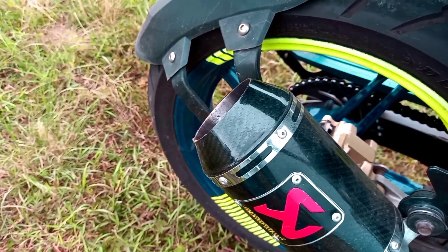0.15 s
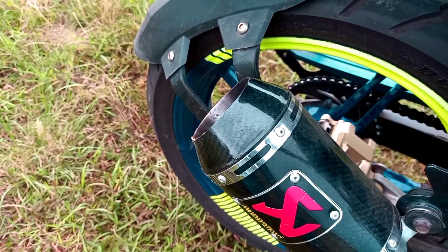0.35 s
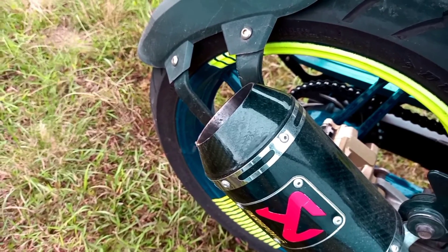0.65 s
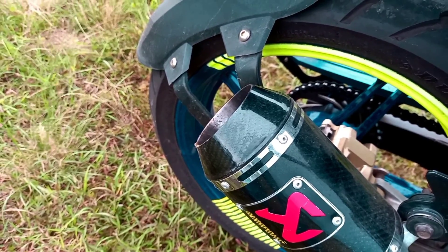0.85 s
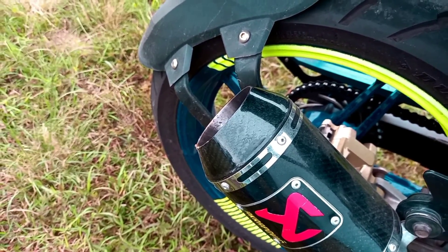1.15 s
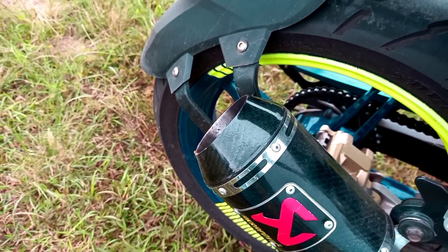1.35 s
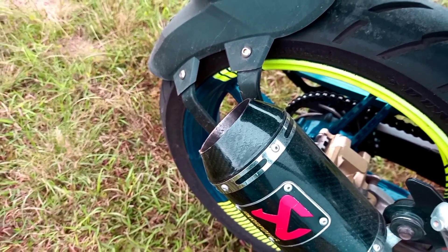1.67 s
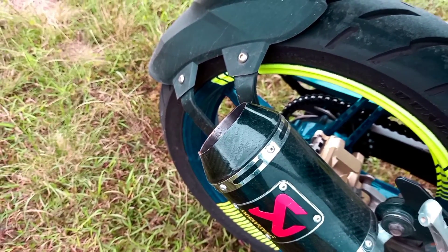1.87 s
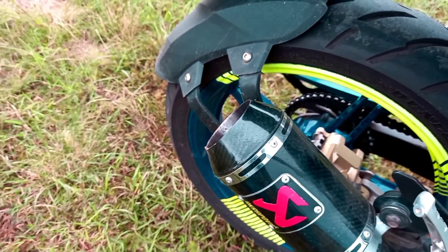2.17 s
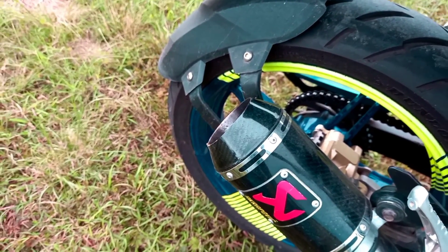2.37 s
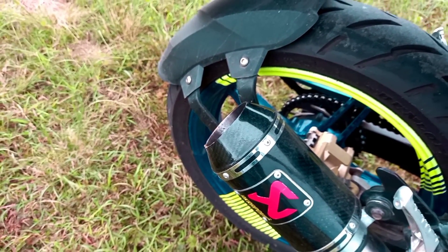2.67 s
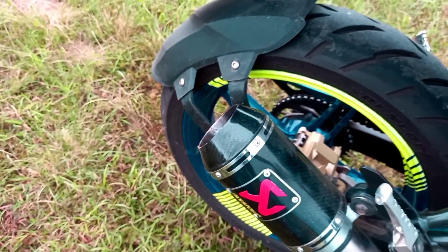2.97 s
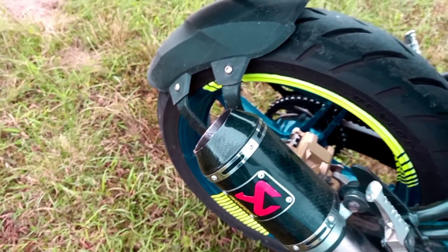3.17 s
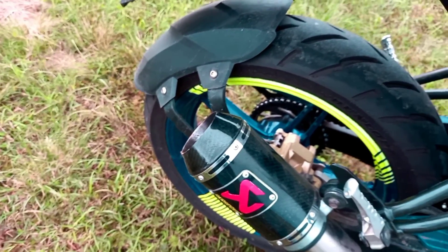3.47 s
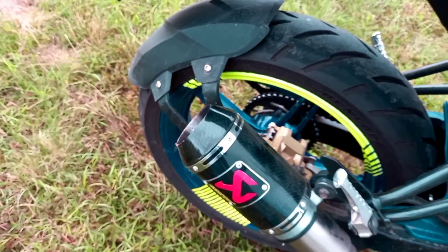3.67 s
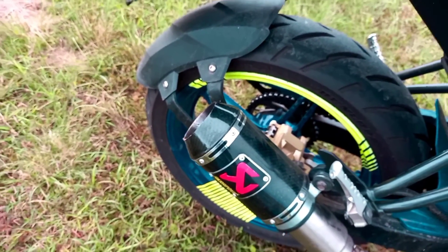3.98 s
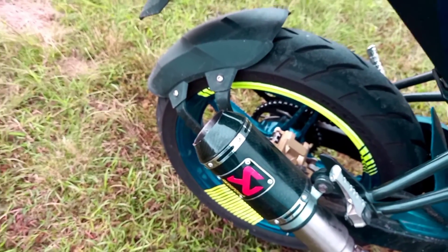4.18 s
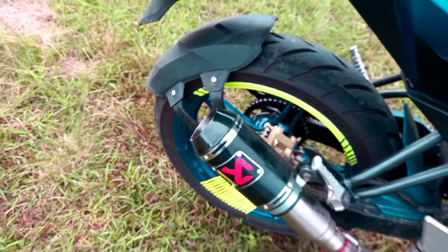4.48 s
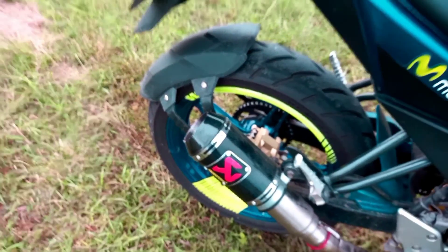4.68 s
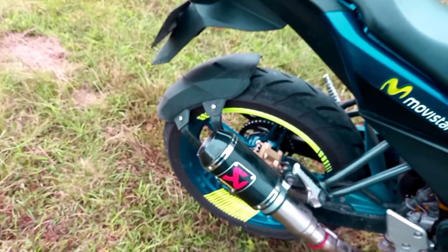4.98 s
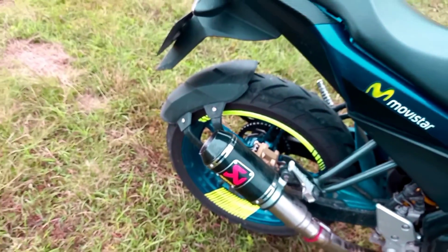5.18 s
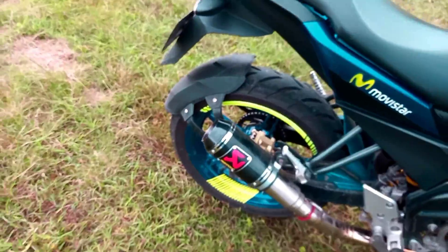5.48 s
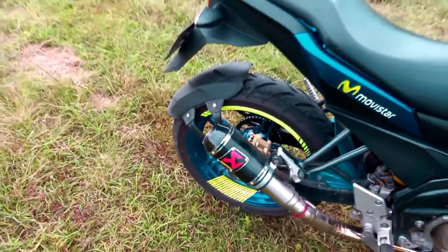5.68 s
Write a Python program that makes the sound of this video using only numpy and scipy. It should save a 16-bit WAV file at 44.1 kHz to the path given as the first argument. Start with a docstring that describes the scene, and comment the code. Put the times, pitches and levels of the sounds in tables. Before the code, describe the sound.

Close to the exhaust in an open field, a motorcycle engine falls from high revs, growling and spitting as it slows. It sputters weakly, almost dying, and a faint rooster crows in the distance. The engine recovers into a loping, uneven idle with booming pops, ticking valves and metallic chatter. A breeze rises and briefly thumps the microphone on the right.

```python
"""Motorcycle running down to idle.

A single-cylinder four-stroke with an open muffler, a metre away in a field, coasts from a hard rev,
nearly stalls, then lopes on strong and weak strokes. Each exhaust valve opening rings the pipe and
spits gas; the engine clatters behind it. Gusts buffet the microphone, a rooster crows far off,
and the phone rounds the loudest booms."""
import sys
import numpy as np
from scipy import signal
from scipy.fft import rfft, irfft, next_fast_len
from scipy.io import wavfile

SR = 44100
rng = np.random.default_rng(int(sys.argv[2]) if len(sys.argv) > 2 else 0)


def persist_wave(psi):
    """Save psi, clipped to +-1, as 16-bit WAV."""
    counts = np.round(np.clip(psi, -1, 1) * 32767).astype(np.int16)
    wavfile.write(sys.argv[1], SR, np.atleast_2d(counts).T)


N = 257544
TIME = np.arange(N) / SR
FFT_SIZE = next_fast_len(N + SR)
FREQ_HZ = np.arange(FFT_SIZE // 2 + 1) * SR / FFT_SIZE
OVERLAP_CYCLES, MAX_CYCLE_S = .273, .125  # valve opening to valve overlap; cap on cycle length

# pipe and muffler modes: f/Hz, width/Hz, signed gain, left minus right/dB
PIPE_MODES = [(83.34, 6.4, -5.5, 0), (169.9, 10.7, 0.9265, -1.5), (259.8, 19, 0.41, -0.5),
              (289.5, 21.4, 0.6357, -0.5), (348.8, 14, 0.36, 0), (410, 55, 0.0145, -1.5),
              (465.3, 14, 0.18, -3.5), (570, 200, -0.04, -0.5), (712, 57, 0.21, -3)]
# gas while coasting: t/s, hiss level/dB, rasp level/dB
GAS_LEVELS = [(0, -50.5, -29.5), (.3, -47.5, -28.5), (.42, -49, -33.5), (1.3, -58.5, -41)]
# gas rasp spectrum: f/Hz, relative level/dB
RASP_SPECTRUM = [(120, -8.5), (300, 4), (500, 4.5), (750, 0.5), (1100, -14.5), (2000, -19), (4000, -31.5),
                 (9000, -34.5)]
# bark and crack spectrum: f/Hz, relative level/dB
BARK_SPECTRUM = [(250, -10.5), (500, -2.5), (780, 3.5), (1050, -7), (1600, -6.5), (2500, -18.5),
                 (6000, -34)]
# running gear, fading as it slows, back at idle: t/s, level/dB
GEAR_LEVELS = [(0, -37), (.65, -46), (2.2, -50.5), (3, -44.5), (5.84, -44.5)]


def undb(db):
    """Decibels to gain."""
    return 10 ** (np.asarray(db) / 20)


def curves(table, at_s=TIME):
    """Table columns, interpolated linearly in time."""
    times, *columns = np.transpose(table)
    return [np.interp(at_s, times, column) for column in columns]


def pan(db):
    """Stereo gains for a left minus right level, constant or per sample."""
    return undb(np.array([[1], [-1]]) * db / 2)


def filtered(x, response):
    """Apply a frequency response."""
    return irfft(rfft(x, FFT_SIZE) * response, FFT_SIZE)[..., :N]


def resonance(hz, width_hz):
    """Band-pass response of one mode, peak 1."""
    s = 1j * FREQ_HZ
    return s * width_hz / (hz ** 2 + s * s + s * width_hz)


def impulses(times, sizes):
    """One impulse per event."""
    return np.bincount(np.clip(times * SR, 0, N).astype(int), sizes, N + 1)[:N]


def puffs(times, sizes, rise_s, decay_s):
    """Envelope of bursts, each peaking at its size."""
    t = TIME[:SR // 4]
    shape = (1 - np.exp(-(t / rise_s) ** 2)) * np.exp(-t / decay_s)
    return signal.fftconvolve(impulses(times, sizes), shape / shape.max())[:N]


def flutter(rate_hz, points):
    """Gaussian random points joined by lines."""
    return np.interp(TIME, np.arange(points) / rate_hz, rng.standard_normal(points))


def noise(spectrum, treble_correlation):
    """Stereo noise, rms 1; the sides are alike in the bass and part in the treble."""
    hz, db = np.transpose(spectrum)
    gain = undb(np.interp(np.log(FREQ_HZ + 1), np.log(hz), db))
    correlation = np.clip(treble_correlation + (1 - treble_correlation) / (1 + (FREQ_HZ / 300) ** 2), -1, 1)
    mid = filtered(rng.standard_normal(N), gain * np.sqrt(1 + correlation))
    side = filtered(rng.standard_normal(N), gain * np.sqrt(1 - correlation))
    out = np.array([mid + side, mid - side])
    return out / out.std()


def coasting(start_hz=35.53, drag_s=1.6915, friction_hz_per_s=2.276, end_s=1.35):
    """Throttle shut: drag and friction slow the cycles; suction fades, and dips in step with the pipe."""
    t = TIME[TIME < end_s]
    friction_hz = friction_hz_per_s * drag_s
    cycle_hz = (start_hz + friction_hz) * np.exp(-t / drag_s) - friction_hz
    cycles = np.cumsum(cycle_hz) / SR
    times = .0024 + np.interp(np.arange(np.ceil(cycles[-1])), cycles, t)
    stroke_hz = np.interp(times, t, cycle_hz)
    in_step = np.abs(np.cos(np.pi * PIPE_MODES[0][0] / stroke_hz)) ** 8.4
    pace = stroke_hz / start_hz
    opening = -.81 * pace ** .57 * (1 - .41 * in_step)
    overlap = -.52 * pace ** .91 * (1 - .29 * in_step)
    return times, opening, overlap


def exhaust(times, cycle_s, opening, overlap, sharp_hz=305, soft_hz=220, mouth_hz=90):
    """Two pressure steps a cycle ring the pipe: one at valve opening, a softer one at valve overlap."""
    # muffler bearing: t/s, left minus right/dB
    bearing = [(0, .6), (1.2, .7), (2.7, -.1), (4.2, .4), (5, -2), (5.84, .4)]
    s = 1j * FREQ_HZ
    steepness = np.minimum(np.abs(opening) / .95, 1)  # stronger step, steeper front
    sharp = impulses(times, opening * steepness)
    soft = impulses(times, opening * (1 - steepness))
    soft += impulses(times + OVERLAP_CYCLES * cycle_s - .0017, overlap)
    drive = rfft(sharp, FFT_SIZE) / (1 + s / sharp_hz) ** 3
    drive += rfft(soft, FFT_SIZE) / (1 + s / soft_hz) ** 3
    pipe = sum(pan(db) * gain * resonance(hz, width_hz) for hz, width_hz, gain, db in PIPE_MODES)
    radiation = s * s / (s * s + np.sqrt(2) * s * mouth_hz + mouth_hz ** 2)  # small mouth, little deep bass
    direct = irfft(drive * pipe * radiation, FFT_SIZE)[:, :N] * SR * undb(-40)
    # wheel, frame and ground scatter the shorter waves, setting the sides apart
    tail = rng.standard_normal(SR // 8) * np.exp(-TIME[:SR // 8] / .0071)
    scatter = rfft(tail / np.linalg.norm(tail), FFT_SIZE) * s / (s + 200)
    side = undb(-12) * filtered(direct.mean(axis=0), scatter)
    return (direct + np.array([side, -side])) * pan(curves(bearing)[0])


def burble(times, pressure, start_hz=300, end_hz=480, hot_hz=462, glide_s=.019, cooling_s=.051):
    """An upper pipe mode bends up as hot gas fills the muffler; at speed it holds steady."""
    t = TIME[:SR // 8]
    glide_hz = end_hz + (start_hz - end_hz) * np.exp(-t / glide_s)
    envelope = (1 - np.exp(-(t / .011) ** 2)) * np.exp(-t / .015)
    cooling = 1 - np.exp(-(np.diff(times, prepend=0) / cooling_s) ** 3)
    out = np.zeros(N + len(t))
    for onset_s, size, cooled in zip(times, np.abs(pressure), cooling):
        pitch_jitter, level_jitter = rng.standard_normal(2)
        hz = cooled * glide_hz * (1 + .035 * pitch_jitter) + (1 - cooled) * hot_hz
        ring = np.sin(2 * np.pi * np.cumsum(hz) / SR)
        start = int(onset_s * SR)
        out[start:start + len(t)] += size ** .7 * undb(-16 + 1.4 * level_jitter) * envelope * ring
    return out[:N] * pan(-1.5)


def coasting_gas(times, afterfire_s=.907, rasp_rise_s=.008, rasp_decay_s=.0083):
    """The jet spits hiss at each stroke; its rasp, much alike in every cycle, growls."""
    # hiss spectrum: f/Hz, relative level/dB
    hiss_spectrum = [(1000, -15.5), (2500, -4), (4000, 1.5), (7000, -1), (9000, -3), (12500, 1.5),
                     (15500, -6)]
    hiss_db, rasp_db = curves(GAS_LEVELS, times)
    spit_db = hiss_db + 3.9 * rng.standard_normal(len(times))
    spit = puffs(times + .0025, undb(spit_db), rise_s=.0092, decay_s=.0098)
    starts = np.append(times + .0011, afterfire_s)  # unburnt fuel flares once in the pipe
    sizes = undb(np.append(rasp_db + 2, -27.5))
    jet = noise(RASP_SPECTRUM, .3)
    fresh = puffs(starts, sizes, rasp_rise_s, rasp_decay_s) * jet
    one_rasp = puffs(np.zeros(1), np.ones(1), rasp_rise_s, rasp_decay_s) * jet[:, ::-1]
    repeated = filtered(impulses(starts, sizes), rfft(one_rasp, FFT_SIZE))
    return spit * noise(hiss_spectrum, .1) * pan(.92) + np.sqrt(.5) * (repeated + fresh) * pan(-2.1)


def cracks(coast_times, pop_times, pressure):
    """Hard cracks: one per coasting stroke, one at valve overlap after a missed idle stroke."""
    _, rasp_db = curves(GAS_LEVELS, coast_times)
    times = np.append(coast_times + .004, pop_times + OVERLAP_CYCLES * MAX_CYCLE_S)
    sizes = np.append(undb(rasp_db - 5), undb(-35) * np.minimum(pressure, 0) ** 2)
    return puffs(times, sizes, rise_s=.0016, decay_s=.0039) * noise(BARK_SPECTRUM, .15) * pan(-1.5)


def idle_gas(times, force):
    """Each pop vents hiss and rasp that grow steeply with force; the hardest bark."""
    # hiss spectrum: f/Hz, relative level/dB
    hiss_spectrum = [(800, 0), (1800, 3.5), (3500, 0), (6000, 3.5), (8000, -4.5), (13000, -5.5),
                     (15500, -14)]
    spit = puffs(times, force ** 1.2 * undb(-45), rise_s=.0027, decay_s=.0039)
    rasp = puffs(times, force ** 2.2 * undb(-33.5), rise_s=.0039, decay_s=.035)
    bark = puffs(times + .0031, force ** 3.3 * undb(-26), rise_s=.0011, decay_s=.009)
    hiss = spit * noise(hiss_spectrum, .1)
    return hiss + (rasp * noise(RASP_SPECTRUM, .37) + bark * noise(BARK_SPECTRUM, .14)) * pan(-3)


def machinery(times, cycle_s, pop_times, force):
    """Chain and gears rustle, valves tick, gears chatter under compression just before each pop."""
    # chain and gear spectrum: f/Hz, relative level/dB
    rustle_spectrum = [(30, 6.5), (100, 11), (300, 17.5), (600, 8.5), (800, 5), (1100, 2), (1600, -2),
                       (2300, -1), (2900, -7), (3400, -9), (4500, -12.5), (6500, -17), (8000, -22),
                       (15000, -23.5)]
    # metal impact spectrum: f/Hz, relative level/dB
    impact_spectrum = [(300, -8), (800, -2.5), (1250, 6), (1800, -2.5), (2150, 3), (2400, 3), (2750, -1.5),
                       (3200, -4.5), (3450, -2), (3800, -5.5), (4400, -5), (5200, -9), (6200, -11),
                       (7600, -24.5), (15000, -30)]
    gear_gain = undb(curves(GEAR_LEVELS)[0])
    # nine small impacts per knock
    time_jitter, level_jitter = rng.standard_normal((len(pop_times), 2, 9)).transpose(1, 0, 2)
    impact_times = pop_times[:, None] - .018 + .007 * time_jitter
    knock_db = curves(GEAR_LEVELS, pop_times)[0] - 5.5 + 11.5 * np.log10(force)
    impact_db = knock_db[:, None] + 2 * level_jitter
    knocks = puffs(impact_times.ravel(), undb(impact_db).ravel(), rise_s=.001, decay_s=.0062)
    tick_times = (times[:, None] + cycle_s[:, None] * np.array([.33, .58])).ravel()
    tick_sizes = undb(-5 + 7 * rng.standard_normal(len(tick_times)))
    ticks = gear_gain * puffs(tick_times, tick_sizes, rise_s=.0003, decay_s=.00074)
    rustle = gear_gain * undb(2.5 + 1.4 * flutter(90, 600)) * noise(rustle_spectrum, .019)
    return (rustle + (knocks + ticks) * noise(impact_spectrum, .067)) * pan(.77)


def casing(pop_times, approach_start_s=2.9, approach_s=1.6):
    """The gears ring the metal casing, most under compression; it emerges as the phone nears."""
    # casing modes: f/Hz, width/Hz, relative level/dB
    modes = [(2420, 140, -5.5), (3454, 64, 5), (3955, 90, 0.5), (5930, 89, -9.5)]
    response = sum(undb(db) * resonance(hz, width_hz) for hz, width_hz, db in modes)
    ring = filtered(rng.standard_normal((2, N)), response)
    nearness = np.clip((TIME - approach_start_s) / approach_s, 0, 1)
    throb = .55 + puffs(pop_times - .025, np.ones(len(pop_times)), rise_s=.006, decay_s=.037)
    return nearness * throb * undb(curves(GEAR_LEVELS)[0] - 14) * ring / ring.std()


def wind(breeze_start_s=2.53, breeze_rise_s=1.5):
    """A breeze gets up; gusts slap the microphone unevenly, mostly on the right."""
    # gusts: t/s, peak level/dB, rise/s, fall/s
    gusts = [(4.139, -39.5, 0.066, 0.036), (5.0, -21.5, .1, 0.092), (5.028, -20, 0.0077, 0.023),
             (5.37, -38.5, 0.033, 0.045)]
    # buffeting spectrum: f/Hz, relative level/dB
    buffet_spectrum = [(25, -11.5), (80, 9), (260, 4.5), (400, -2), (600, -9), (1200, -21.5), (2500, -44.5),
                       (6000, -61), (12000, -69.5)]
    envelope = undb(-40) * np.clip((TIME - breeze_start_s) / breeze_rise_s, 0, 1)
    for peak_s, db, rise_s, fall_s in gusts:
        width_s = np.where(TIME < peak_s, rise_s, fall_s)
        envelope += undb(db) * np.exp(-((TIME - peak_s) / width_s) ** 2)
    slaps = undb(1.3 * flutter(190, 1200))
    return envelope * slaps * noise(buffet_spectrum, .19) * pan(-20.5)


def rooster(start_s=1.06, end_s=2.13, fade_s=.035, throat_width_hz=330):
    """One far, hoarse note scoops up, sags and drops; two throat resonances favour nearby partials."""
    # crow partials: harmonic number, relative level/dB
    partials = [(2, -9), (3, 0.5), (4, -3), (6, -17), (7, -5)]
    # lower throat resonance: t/s, f/Hz
    throat = [(1.16, 2500), (1.27, 2920), (1.4, 2950), (1.52, 2240), (2.02, 2300), (2.1, 1900)]
    since_s, left_s = np.maximum(TIME - start_s, 0), np.maximum(end_s - TIME, 0)
    scoop_hz, drop_hz = 80 * np.exp(-since_s / .12), 237 * np.exp(-left_s / .067)
    hz = 668 - 28 * since_s - scoop_hz - drop_hz
    envelope = np.minimum(np.minimum(since_s, left_s) / fade_s, 1)
    throat_hz, = curves(throat)
    phase = 2 * np.pi * np.cumsum(hz * (1 + .0076 * flutter(190, 1200))) / SR
    out = 0
    for harmonic, db in partials:
        lower_loss_db = 3 * ((harmonic * hz - throat_hz) / throat_width_hz) ** 2
        upper_loss_db = 3 * ((harmonic * hz - 1.57 * throat_hz) / throat_width_hz) ** 2 + 5
        loss_db = np.minimum(np.minimum(lower_loss_db, upper_loss_db), 15)
        out += undb(db - 57 - loss_db) * np.sin(harmonic * phase)
    return envelope * out


def scene():
    """The run-down passes straight into the single pops of the idle."""
    # idle pops: t/s, relative pressure at valve opening (+ fired, blows; - missed, sucks)
    pops = [(1.3964, 0.32), (1.4705, -0.5), (1.5517, -0.31), (1.6374, -0.32), (1.7574, -0.18),
            (1.8307, -0.22), (1.934, 0.29), (2.08, -0.14), (2.1675, 0.4), (2.3214, -0.13), (2.4156, 0.53),
            (2.5413, 0.29), (2.6677, 0.61), (2.7814, -0.31), (2.9009, 0.73), (3.0168, 0.36), (3.1363, 0.91),
            (3.2478, -0.78), (3.3701, 0.91), (3.4834, -0.6), (3.6043, 0.77), (3.719, -0.34), (3.8422, 0.83),
            (3.9532, -0.45), (4.0707, 0.45), (4.196, 0.52), (4.3211, 0.34), (4.4465, 0.63), (4.565, -0.62),
            (4.6992, 0.67), (4.811, -0.38), (4.9334, 0.68), (5.0728, 0.35), (5.1883, 0.67), (5.3057, -0.47),
            (5.4352, 0.56), (5.5494, -0.45), (5.6734, 0.55), (5.7904, -0.35)]
    coast_times, coast_opening, coast_overlap = coasting()
    pop_times, pressure = np.transpose(pops)
    fired = pressure > 0
    force = np.abs(pressure) * np.where(fired, 1, .7)  # sucking is quieter
    pop_overlap = -np.abs(pressure) * np.where(fired, .41, .44)
    times = np.append(coast_times, pop_times)
    opening = np.append(coast_opening, pressure)
    overlap = np.append(coast_overlap, pop_overlap)
    cycle_s = np.minimum(np.diff(times, append=np.inf), MAX_CYCLE_S)
    pipe = exhaust(times, cycle_s, opening, overlap) + burble(times, opening)
    gas = coasting_gas(coast_times) + cracks(coast_times, pop_times, pressure) + idle_gas(pop_times, force)
    metal = machinery(times, cycle_s, pop_times, force) + casing(pop_times)
    return pipe + gas + metal + wind() + rooster()


def record(dry):
    """The phone flattens the loudest booms and cuts the highest treble."""
    ceiling, cutoff_hz = 1.03, 15700
    rounded = dry / (1 + np.abs(dry / ceiling) ** 8) ** (1 / 8)
    return signal.sosfilt(signal.ellip(8, .2, 80, cutoff_hz, fs=SR, output="sos"), rounded)


dry = scene()
out = record(dry)
persist_wave(out)
```